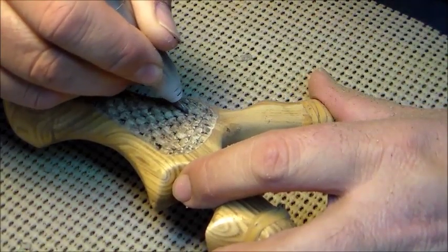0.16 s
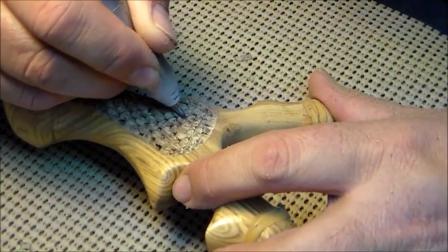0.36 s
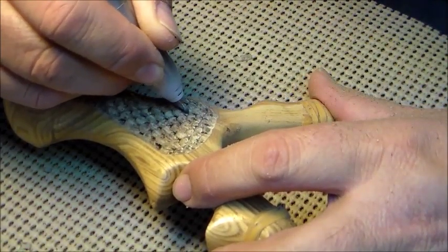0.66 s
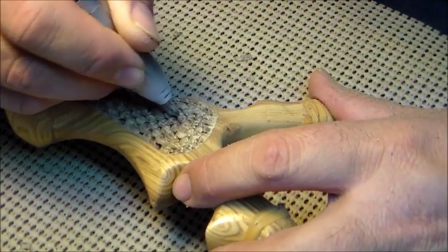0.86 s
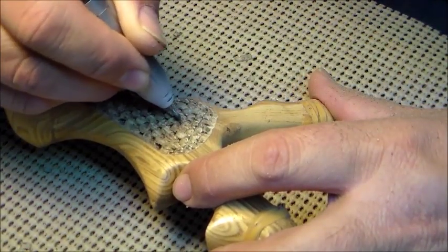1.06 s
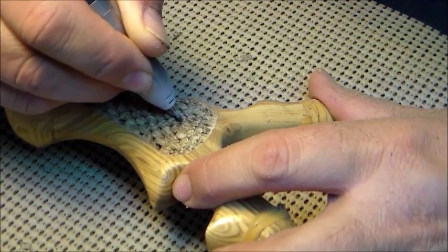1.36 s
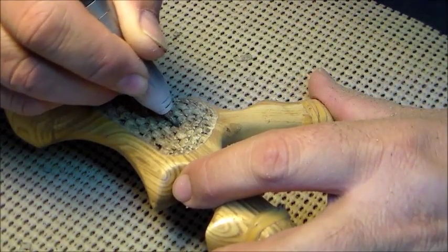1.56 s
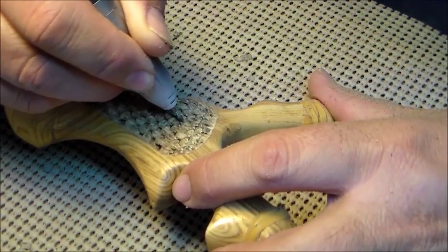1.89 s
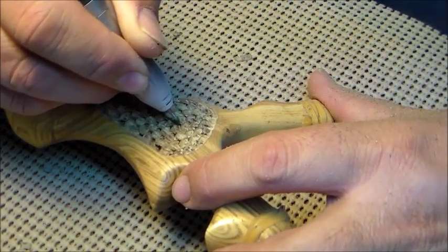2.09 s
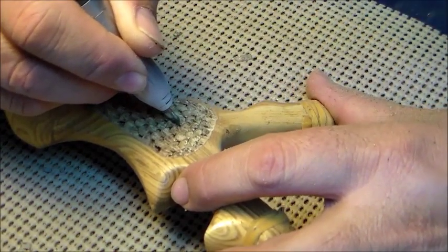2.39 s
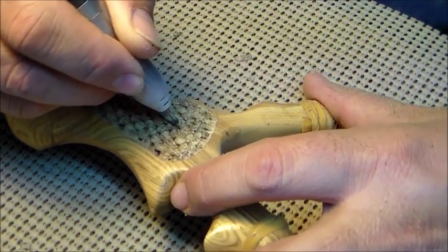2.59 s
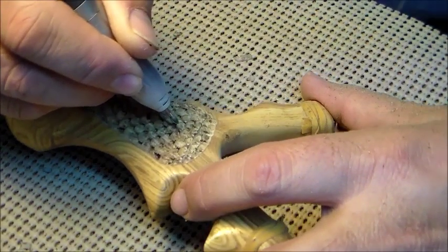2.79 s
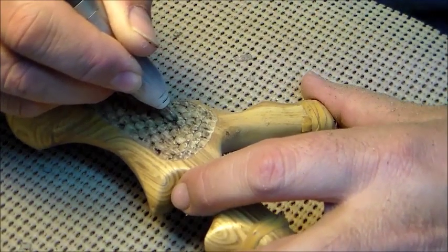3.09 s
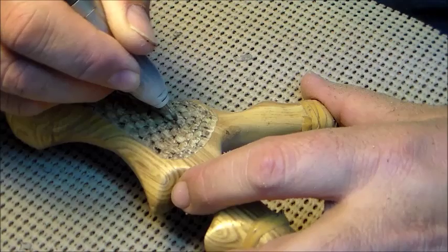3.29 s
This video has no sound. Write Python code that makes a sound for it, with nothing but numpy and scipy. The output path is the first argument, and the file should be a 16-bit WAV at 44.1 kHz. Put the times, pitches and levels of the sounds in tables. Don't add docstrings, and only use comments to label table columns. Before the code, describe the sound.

A handheld air-turbine carver whistles very high and thin, sagging slightly and brightening as its burr bites wood, amid constant exhaust hiss; a compressor drones low to the right. Close stereo pickup in a workshop.

```python
import sys
import numpy as np
from scipy import signal
from scipy.fft import rfft, irfft, next_fast_len
from scipy.io import wavfile
from scipy.ndimage import uniform_filter1d

SR = 44100
rng = np.random.default_rng(int(sys.argv[2]) if len(sys.argv) > 2 else 0)


def undo_db(level):
    steps = np.asarray(level, float) / 20
    return 10 ** steps


def unload_wav(signal):
    wavfile.write(
        sys.argv[1],
        SR,
        np.round(np.clip(np.atleast_2d(signal).T, -1, 1) * 32767).astype(np.int16),
    )


N = 152145

# (frequency [Hz], left minus right [dB], left leads by [rad], unrelated part [dB])
PORT_PAIR = [(56, -11.5, 0.36, -3.5), (250, -2, 0.77, -7), (520, -0.2, 0.16, -15), (1100, -2, 0.091, -23),
             (2390, 3, 0.36, -38), (4280, -3.5, 0.25, -12.5), (6500, 0, .3, 0.5), (14000, 2.5, .6, -5.5)]
LEFT_RIGHT = np.array([[1], [-1]])
CAGE_SHARE = 0.4086
CRANK_HZ, STROKE_S = 28.15, -0.0056


def turbine():
    shaft = shaft_angle()
    return np.sqrt(2) * (whistle(shaft) + burr(shaft) + cage_whirl(shaft))


def shaft_angle():
    # (time [s], shaft speed [Hz])
    speed = [(0.0, 5777), (0.14, 5785), (0.24, 5710), (0.41, 5750), (0.5, 5680), (0.54, 5664), (0.67, 5720),
             (0.8, 5725), (1.05, 5789), (1.49, 5808), (1.65, 5763), (1.81, 5778), (1.93, 5702),
             (1.96, 5680), (2.08, 5741), (2.18, 5781), (2.4, 5819), (3.44, 5834)]
    shaft_hz = curve(speed, smooth_s=0.027) + 1.42 * walk(24.84)
    return 2 * np.pi * np.cumsum(shaft_hz) / SR


def whistle(shaft):
    # (time [s], left level [dB], right level [dB])
    port_levels = [(0, -36.5, -42), (.11, -37, -62.5), (.19, -46, -30.5), (.26, -33.5, -46),
                   (.53, -37.5, -35), (.64, -36, -48.5), (.9, -36.5, -39), (1.08, -37, -42),
                   (1.3, -34, -51), (1.48, -32.5, -43), (1.8, -35.5, -43.5), (1.89, -47, -33),
                   (1.96, -30.5, -35), (2.3, -29.5, -45), (2.51, -33.5, -35.5), (2.72, -38, -52),
                   (2.95, -32.5, -36.5), (3.45, -32.5, -34)]
    # (time [s], half length [s], depth [dB])
    nulls = [(.05, 0.0224, -4.5), (0.154, .02, -7), (0.354, 0.037, -8), (0.421, .015, -5),
             (0.639, .025, -1.5), (0.799, 0.027, -4), (0.933, 0.038, -9.5), (1.082, 0.075, -0.5),
             (1.806, 0.011, -10.5), (1.84, .012, -8), (1.865, 0.007, -6), (1.914, 0.0085, -10.5),
             (2.013, 0.0252, -3.5), (2.078, 0.021, -9.5), (2.17, .02, -9), (2.238, 0.021, -9),
             (2.393, 0.021, -0.5), (2.623, 0.053, -3.5)]
    t = np.arange(N) / SR
    dips = np.array([np.exp(-((t - when) / half) ** 2) for when, half, _ in nulls])
    dip_db = np.array(nulls)[:, 2] @ dips
    lag_rad = 0.9 + 1.7 * dips.sum(axis=0) + 0.3 * walk(4.4)
    level = undo_db([curve(port_levels, col=c) + dip_db + 1.0 * walk(13) for c in (1, 2)])
    return level * np.sin(shaft + lag_rad * LEFT_RIGHT / 2)


def burr(shaft):
    # (time [s], half length [s], left level [dB], right level [dB])
    bites = [(0.153, 0.03, -40, -43), (0.204, 0.024, -29, -36), (0.341, 0.093, -42, -45),
             (.46, .03, -36, -40), (0.528, 0.056, -33.5, -37.5), (.67, .018, -36.5, -41.5),
             (.76, 0.039, -38.5, -52), (1.58, 0.11, -43, -42), (1.82, 0.025, -35, -32.5),
             (1.92, 0.045, -29, -35.5), (2.121, 0.124, -43, -43), (2.979, .18, -41.5, -49),
             (3.35, 0.098, -60, -54)]
    t = np.arange(N) / SR
    bite = 0
    for when, half, left_db, right_db in bites:
        bite = bite + undo_db([[left_db], [right_db]]) * np.exp(-((t - when) / half) ** 4)
    idle = undo_db([-48 + 1.8 * walk(14) for _ in range(2)])
    level = np.maximum(bite * undo_db(0.8 * walk(29.7)), idle)
    left_lead_rad = 0.4 * np.array([[1], [0]])
    octave = level * np.sin(2 * shaft + left_lead_rad)
    sideband = undo_db(-19) * bite * np.sin((2 - CAGE_SHARE) * shaft + 0.5 * walk(43.2))
    return octave + sideband


def cage_whirl(shaft):
    # (time [s], level [dB])
    whirl = [
        (0, -63),
        (2.1, -63),
        (2.45, -53),
        (2.75, -48.5),
        (3.45, -47),
    ]
    level = undo_db(curve(whirl, smooth_s=0.1) + 1.2 * walk(70))
    return level * np.sin(CAGE_SHARE * shaft + 0.2 * walk(30))


def air(turn):
    # (frequency [Hz], level [dB per Hz])
    hiss = [(1000, -87), (1700, -80.5), (2500, -71.5), (3500, -69.5), (5500, -71.5), (7600, -73),
            (10000, -71), (14500, -67.5)]
    # (frequency [Hz], width [Hz], level over the air [dB])
    resonances = [(2490, 370, 4.5), (3388, 330, 2), (4120, 190, 4.5), (4270, 191, 4), (4895, 48, 8.5),
                  (5170, 80, -6), (7230, 150, 3.5), (7496, 285, -7), (9020, 450, 4), (10500, 190, 3.5),
                  (12123, 420, 5), (13000, 280, 3), (6100, 150, 0), (14400, 240, 7)]
    ripple_hz = 30
    ripple_db = 1.0 * rng.standard_normal(int(SR / 2 / ripple_hz) + 2)

    def colour_db(hz):
        level_db = on_log(hiss, hz) - 10
        level_db = level_db + np.interp(hz / ripple_hz, np.arange(len(ripple_db)), ripple_db)
        for centre, width, peak_db in resonances:
            level_db = level_db + peak_db / (1 + (2 * (hz - centre) / width) ** 2)
        return level_db

    puff = 1 + 0.17 / 2 * np.cos(2 * turn)
    return bands(colour_db, puff)


def crank_angle():
    t = np.arange(N) / SR - STROKE_S
    return 2 * np.pi * CRANK_HZ * t + 0.0033 * walk(0.772)


def compressor(turn):
    drone_orders = [-54, -24.5, -64.5, -34.5, -57.5, -39, -42.5, -46.5, -52.5, -55.5, -47, -43.5, -66, -59,
                    -66.5, -62.5, -86, -62.5, -57.5, -90, -70, -65.5, -78, -67.5, -89, -79, -61.5]
    buzz_orders = [-65.5, -73.5, -56, -57.5, -66.5, -57.5, -99, -61, -62, -95, -73, -60, -69.5, -72, -71,
                   -70, -73.5, -66, -77.5, -73, -69, -70.5, -65, -63, -68.5, -75, -65]
    lone_orders = {62: -68, 72: -65, 75: -70, 91: -67, 128: -65}
    # (frequency [Hz], level [dB per Hz])
    rumble = [(20, -63.5), (45, -61.5), (100, -61), (250, -70), (450, -74), (650, -79.5), (1000, -77),
              (1600, -78)]
    wobble = [undo_db(0.9 * walk(3)) for _ in range(6)]
    luck = rng.standard_normal((130, 3))
    levels = dict(enumerate(drone_orders + buzz_orders, start=1))
    for order in range(55, 72):
        levels[order] = -76 + 2.5 * luck[order, 0]
    levels.update(lone_orders)

    orders = 0
    for order, db in levels.items():
        far = min(order / 30, 1)
        pan_db = 0.9 * far * LEFT_RIGHT
        gain = ports(np.array([order * CRANK_HZ])) * undo_db(db - 1 + pan_db * luck[order, 1])
        phase = 2.69 * max(order - 6, 0) ** 2
        phase = phase + 2.5 * (order > 10)
        phase = phase + 0.14 * pan_db * luck[order, 2] + np.angle(gain)
        level = np.sqrt(2) * abs(gain) * (1 - far + far * wobble[order % 6])
        orders = orders - level * np.cos(order * turn + phase)

    def rumble_db(hz):
        return on_log(rumble, hz) - 6 - 30 * (hz > 2500)

    return orders + bands(rumble_db, 1)


def bands(colour_db, puff):
    size = next_fast_len(N)
    hz = np.fft.rfftfreq(size, 1 / SR)
    gain = undo_db(colour_db(hz)) * np.sqrt(SR / 2)
    shared, own = rfft(rng.standard_normal((2, size))) * gain
    unrelated = undo_db(on_log(PORT_PAIR, hz, col=3)) * own * LEFT_RIGHT
    pair = ports(hz) * shared + unrelated
    place = 2 * np.log2(np.maximum(hz, 1) / 20)
    swell_db = 0.25 * walk(1.5)
    out = 0
    for k in np.unique(np.round(place[gain > gain.max() / 30])):
        crossfade = np.clip(1 - abs(place - k), 0, 1)
        band = irfft(pair * crossfade, size)[:, :N]
        out = out + band * undo_db(swell_db + 0.64 * walk(8.35))
    return out * puff


def ports(hz):
    left = undo_db(on_log(PORT_PAIR, hz)) * np.exp(1j * on_log(PORT_PAIR, hz, col=2))
    return np.array([left, 1 + 0 * left]) * 2 / (1 + left)


def on_log(table, hz, col=1):
    table = np.array(table, float)
    return np.interp(np.log(np.maximum(hz, 1)), np.log(table[:, 0]), table[:, col])


def curve(table, col=1, smooth_s=0.013):
    table = np.array(table, float)
    line = np.interp(np.arange(N) / SR, table[:, 0], table[:, col])
    return uniform_filter1d(line, int(smooth_s * SR), mode="nearest")


def walk(rate):
    k = int(SR / rate)
    steps = np.repeat(rng.standard_normal(N // k + 1), k)
    return 1.59 * uniform_filter1d(uniform_filter1d(steps, k), k)[:N]


def scene():
    turn = crank_angle()
    return turbine() + air(turn) + compressor(turn)


def top_cut(x):
    return signal.sosfilt(signal.butter(12, 14470, fs=SR, output="sos"), x)


def record(dry):
    low_pass = signal.ellip(12, 0.2, 70, 14130, fs=SR, output="sos")
    mix = signal.sosfilt(low_pass, dry)
    return top_cut(mix)


dry = scene()
out = record(dry)
unload_wav(out)
```